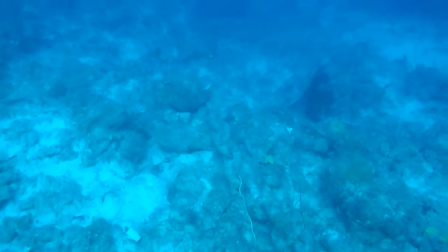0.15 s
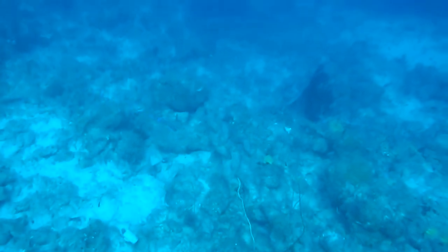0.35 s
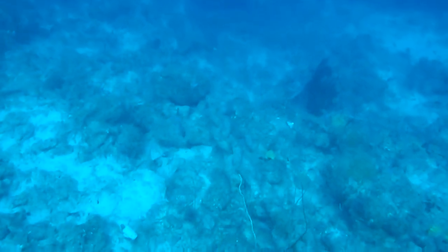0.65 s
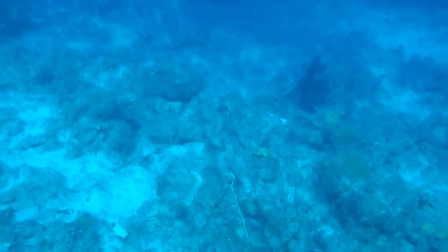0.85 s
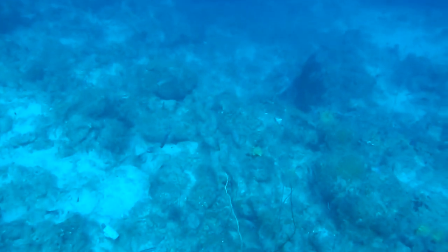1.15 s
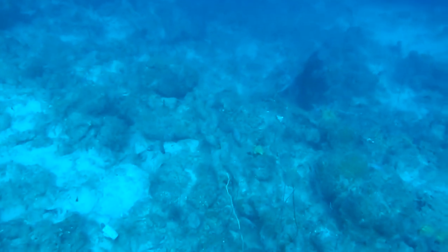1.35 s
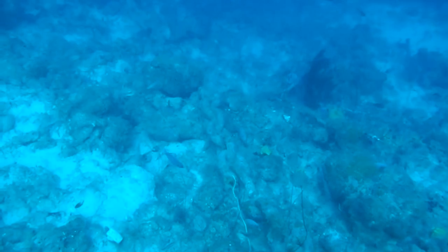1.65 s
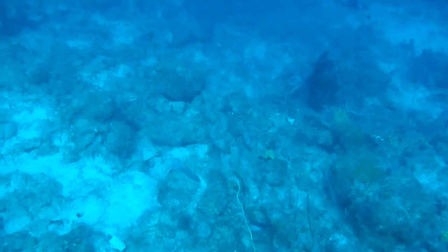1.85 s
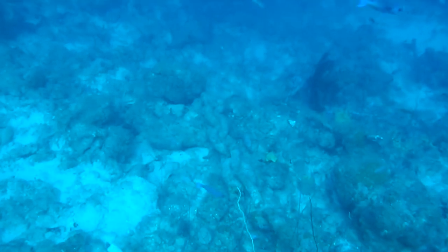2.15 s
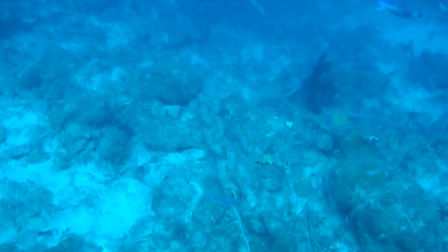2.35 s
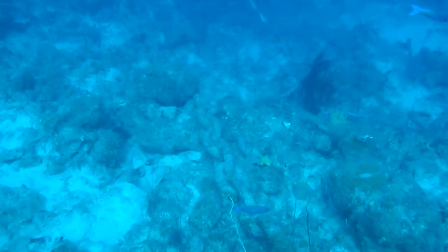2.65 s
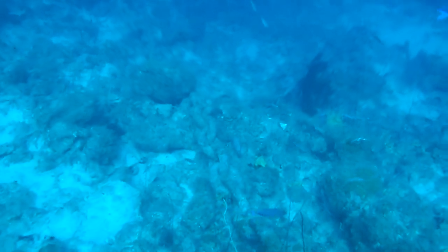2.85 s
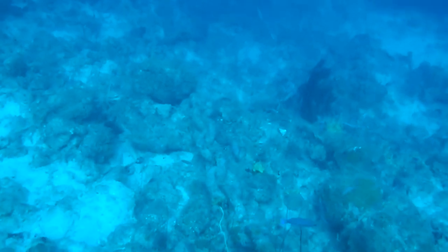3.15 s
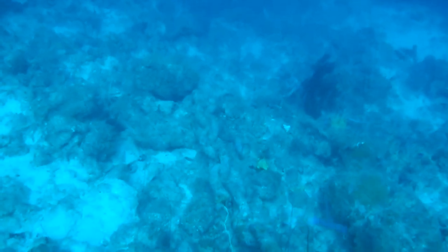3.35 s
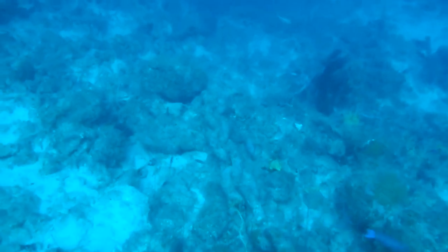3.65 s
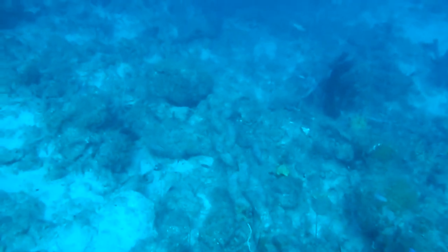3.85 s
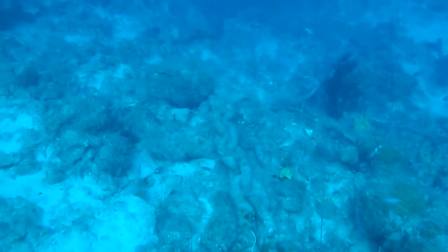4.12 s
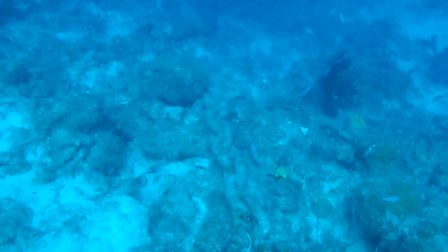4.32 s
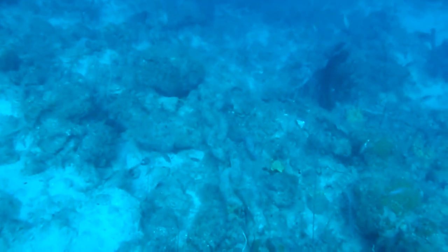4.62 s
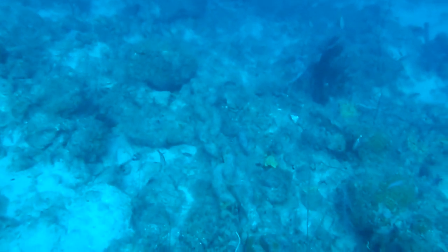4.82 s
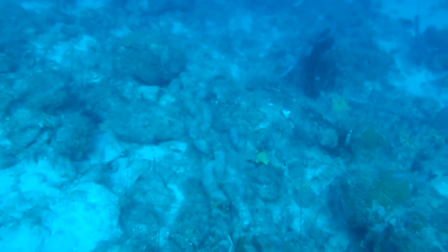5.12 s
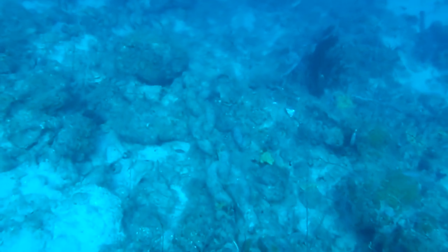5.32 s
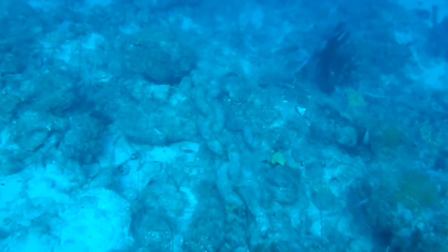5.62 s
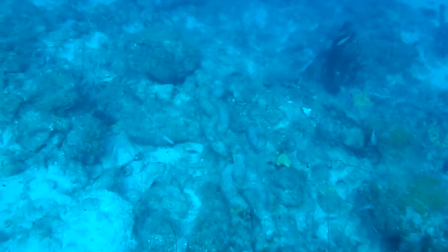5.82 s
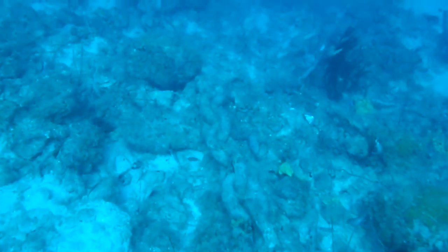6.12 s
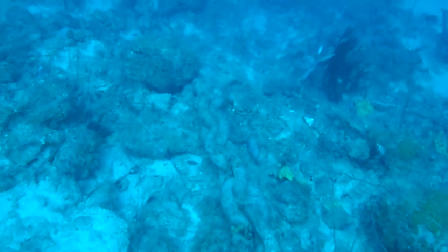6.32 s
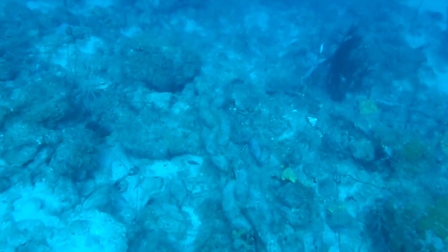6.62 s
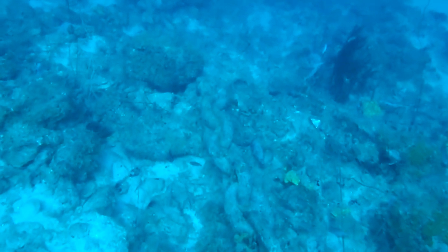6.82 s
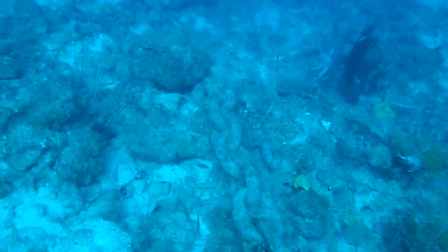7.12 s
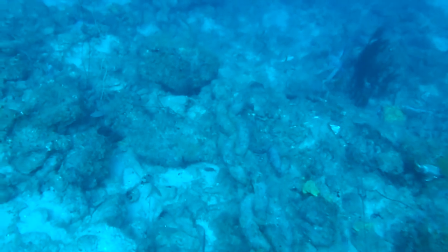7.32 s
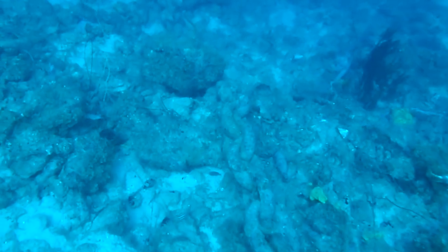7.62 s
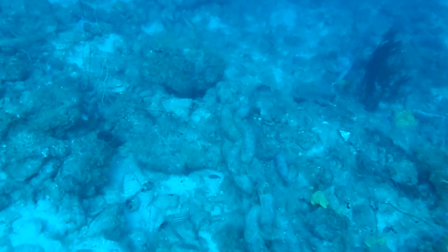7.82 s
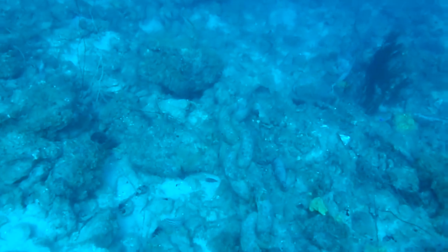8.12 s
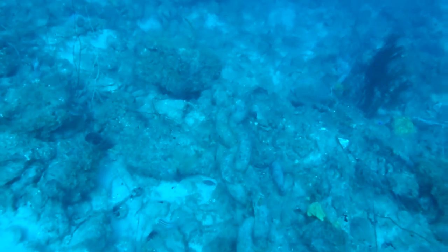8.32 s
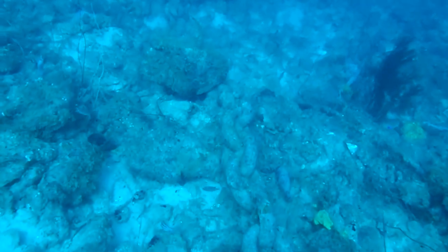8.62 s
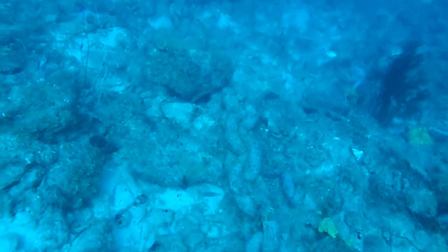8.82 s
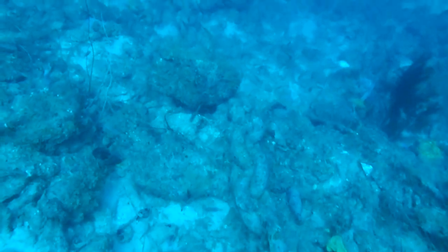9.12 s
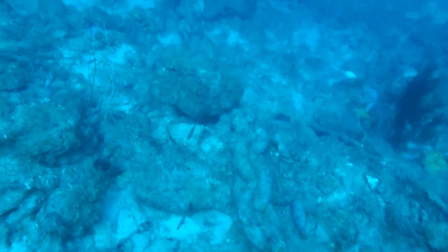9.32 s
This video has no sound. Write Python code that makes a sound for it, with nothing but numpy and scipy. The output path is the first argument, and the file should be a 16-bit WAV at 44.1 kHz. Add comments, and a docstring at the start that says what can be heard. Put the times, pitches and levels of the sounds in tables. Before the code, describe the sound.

A boat engine drones at constant speed, heard underwater through a camera's diving housing. Its rapid knocking rings the hull, while loose parts rattle, a pump whines and churned water rushes behind it. The housing takes a few soft bumps early on, and some harder knocks make the hull boom briefly. The reef adds occasional small pops and two faint ticks.

```python
"""A boat's engine drones at a steady 1800 rpm, heard through the water by a camera in a diving housing.
From the start its knocks repeat fifteen times a second and ring the hull; loose parts rattle, a pump
whines and churned water rushes behind them. From 1.1 s the housing is bumped softly, and from 1.4 s the
reef gives a few small pops. Between 2.3 and 6 s some harder knocks make the hull boom.
Two faint ticks come from the reef at 4.9 and 7.5 s."""
import sys
import numpy as np
from scipy.fft import rfft, irfft, next_fast_len
from scipy.io import wavfile
from scipy.ndimage import map_coordinates

SR = 44100
rng = np.random.default_rng(int(sys.argv[2]) if len(sys.argv) > 2 else 0)


def master(y):
    """Save y as 16-bit WAV."""
    cut = np.clip(np.atleast_2d(y).T, -1, 1)
    pcm = np.round(cut * 32767)  # scale
    wavfile.write(sys.argv[1], SR, pcm.astype(np.int16))


N = 417627
CYCLE_HZ = 15.0  # one engine cycle is two turns of the crankshaft


def amp(db):
    """Amplitude ratio of a level in decibels."""
    return 10 ** (np.asarray(db) / 20)


def unit(x):
    """Normalisation to rms 1."""
    return x / np.sqrt(np.mean(x ** 2) + 1e-20)


def spectrum_db(points, hz):
    """Interpolation of (f/Hz, level/dB) points in log frequency, silent beyond the ends."""
    f, db = np.transpose(points)
    return np.interp(np.log(hz + 1), np.log(f + 1), db, left=-120, right=-120)


def envelope_db(points):
    """Linear interpolation of (t/s, level/dB) points at every sample."""
    s, db = np.transpose(points)
    return np.interp(np.arange(N) / SR, s, db)


def wobble(rate):
    """Slow random modulation: a spline through Gaussian knots, rate of them a second."""
    coarse = np.linspace(0, N, 2000)
    knots = rng.standard_normal(400)
    return np.interp(np.arange(N), coarse, map_coordinates(knots, [coarse * rate / SR], mode="mirror"))


def filtered(x, response):
    """Linear filtering: the spectrum of x times a frequency response."""
    m = next_fast_len(len(x) + SR // 4)
    return irfft(rfft(x, m) * response(np.fft.rfftfreq(m, 1 / SR)), m)[:len(x)]


def resonance(hz, centre, width):
    """Complex response of a damped oscillator."""
    return 1j * hz * width / (centre ** 2 - hz ** 2 + 1j * hz * width)


def noise(spectrum, lifts=(), ripple_db=0):
    """Coloured noise of rms 1, lifted at resonances and comb-filtered by multipath interference."""
    delays_s, phases = rng.uniform(.002, .022, 24), rng.uniform(0, 2 * np.pi, 24)
    grid = np.arange(0, SR / 2, 2)
    comb = unit(np.cos(2 * np.pi * np.outer(grid, delays_s) + phases).sum(1))
    peaks_db = sum(lift * abs(resonance(grid, centre, width)) ** 2 for centre, width, lift in lifts)
    db = spectrum_db(spectrum, grid) + ripple_db * comb + peaks_db
    return unit(filtered(rng.standard_normal(N), lambda hz: np.interp(hz, grid, amp(db))))


def tone(turns, fade_db, fade_rate, drift_rad):
    """Multipath fading: a tone of rms 1 wavers as its paths off surface and seabed shift."""
    fading = amp(fade_db * wobble(fade_rate))
    return unit(fading * np.sin(2 * np.pi * turns + drift_rad * wobble(fade_rate)))


def echo_beat(hz, minimum_s, gain):
    """Two-path interference: a tone dips once for each wavelength that its echo's path gains."""
    path_m_per_s, sound_m_per_s = .308, 1500
    wavelengths = hz * path_m_per_s * (np.arange(N) / SR - minimum_s) / sound_m_per_s
    return unit(abs(1 - gain * np.exp(2j * np.pi * wavelengths)))


# Engine line spectrum: harmonic of the cycle rate, relative level/dB
ENGINE_ORDERS = [(1, -39), (2, -29), (3, -16), (4, -10), (5, -11), (6, -15), (7, -6), (8, -6), (9, -3),
                 (10, -10), (11, -2), (12, 0), (13, -15), (14, -13), (15, -15), (16, -9.5), (17, -11.5),
                 (18, -14), (19, -17), (20, -14), (21, -16), (22, -16), (23, -17), (24, -14), (25, -15),
                 (26, -13), (27, -16), (28, -18), (29, -20), (30, -9), (31, -15), (32, -14), (33, -10),
                 (34, -6.5), (35, -12), (36, -9), (37, 0), (38, -9), (39, -6), (40, -4), (41, -1.5),
                 (42, -6.5), (43, -6), (44, -10), (45, -18), (46, -21), (47, -15.5), (48, -27), (49, -19),
                 (50, -24)]
# Knocks that set the orders' phases: position/cycles, hull mode f/Hz, bandwidth/Hz, weight/dB
CYCLE_KNOCKS = [(.05, 590, 90, -3), (.148, 247, 92, -1), (.17, 56, 16, -3), (.306, 468, 27, 17),
                (.412, 104, 49, -5), (.413, 531, 131, 0), (.511, 607, 80, 0), (.582, 145, 19, 5),
                (.629, 462, 90, -8), (.646, 96, 32, -13), (.815, 310, 80, -2), (.83, 600, 80, -1),
                (.88, 526, 18, 7), (.972, 197, 35, 1)]
# Orders with a strong echo: harmonic, interference minimum t/s, echo gain
ENGINE_ECHOES = [(16, 1, 0.33), (17, 0, 0.42), (47, 2, 0.47), (49, 2.5, 0.46)]
# Envelope of the ringing hull: t/s, level/dB
RING_LEVEL = [(0.1, -26), (1.5, -26.2), (3.0, -27.1), (4.7, -28.6), (7.0, -29.2), (9.3, -29.2)]
def engine(cycle):
    """Periodic forcing gives a harmonic series: low orders are exhaust throb, high ones ring the hull."""
    throb, ring = np.zeros(N), np.zeros(N)
    echoes = {round(k): echo for k, *echo in ENGINE_ECHOES}
    for k, db in ENGINE_ORDERS:
        blows = sum(amp(weight) * resonance(k * CYCLE_HZ, hz, width) * np.exp(-2j * np.pi * k * place)
                    for place, hz, width, weight in CYCLE_KNOCKS)
        turns = k * cycle + np.angle(blows) / (2 * np.pi)
        if k <= 13:
            throb += amp(db) * tone(turns, fade_db=.6, fade_rate=1.2, drift_rad=.05)
        else:  # short waves fade more as the camera moves
            beat = echo_beat(k * CYCLE_HZ, *echoes[k]) if k in echoes else 1
            ring += amp(db) * beat * tone(turns, fade_db=1, fade_rate=.9, drift_rad=.28)
    ring_db = envelope_db(RING_LEVEL)
    throb_db = -28.5 + .17 * (ring_db - ring_db.mean())  # long waves follow the swings only in part
    return amp(throb_db) * unit(throb) + amp(ring_db) * unit(ring)


# Spectrum of the hull's rough noise: f/Hz, relative level/dB
ROUGH_SPECTRUM = [(380, -46), (450, -15.5), (490, -5), (535, -2.5), (565, -0.5), (603, 2), (655, -6),
                  (705, -13.5), (745, -19.5), (820, -41)]
# Envelope of that noise: t/s, level/dB
ROUGH_LEVEL = [(0.1, -35.5), (2.0, -35.5), (2.5, -34), (3.6, -34), (4.1, -35.5), (4.7, -38.3), (9.3, -38.5)]
# Envelope of the hull's strongest mode: t/s, level/dB
BOOM_LEVEL = [(0.1, -38), (1.6, -36.5), (2.0, -38), (2.5, -34), (2.76, -28.5), (2.9, -37), (3.3, -34.5),
              (3.68, -32), (3.87, -37), (4.1, -36.5), (4.7, -43), (9.3, -42)]
BOOM_HZ = 598.5
def hull_noise(swell):
    """Random excitation: no two knocks are alike, so the hull gives rough noise and one mode booms."""
    rough = unit(swell * noise(ROUGH_SPECTRUM))
    mode = filtered(rng.standard_normal(N), lambda hz: resonance(hz, BOOM_HZ, width=54) ** 2)
    return amp(envelope_db(ROUGH_LEVEL)) * rough + amp(envelope_db(BOOM_LEVEL)) * unit(swell * mode)


# Spectrum of the loose parts: f/Hz, relative level/dB
RATTLE_SPECTRUM = [(600, -32.5), (800, -8), (950, -1.5), (1100, 1), (1300, -3), (1500, -4.5), (1580, -7.5),
                   (1900, -32.5)]
# Their resonances: f/Hz, bandwidth/Hz, lift/dB
RATTLE_MODES = [(888, 16, 7), (1075, 35, 6.5), (1272, 29, 6), (1437, 24, 9)]
def loose_parts(cycle):
    """Impact noise swells at each firing: random strikes rattle, those alike in every cycle buzz."""
    firing = amp(np.cos(2 * np.pi * 6 * cycle))  # six firings a cycle
    rattle = noise(RATTLE_SPECTRUM, RATTLE_MODES)
    period = round(SR / CYCLE_HZ)
    strikes = irfft(np.exp(2j * np.pi * rng.random(period // 2 + 1)), period)
    buzz = filtered(np.resize(strikes, N), lambda hz: amp(spectrum_db(RATTLE_SPECTRUM, hz)))
    return amp(-47.6) * unit(firing * rattle) + amp(-46.5) * unit(firing * buzz)


# Envelope of the ringing panel: t/s, level/dB
PANEL_LEVEL = [(0.1, -52.5), (0.8, -56), (3.2, -51.5), (3.7, -55.5), (4.3, -49.5), (5.5, -56), (6.4, -53),
               (8.3, -52), (9.3, -56.5)]
def panel(swell):
    """Resonance: a panel driven by broadband noise rings in one narrow band."""
    ring = filtered(swell * rng.standard_normal(N), lambda hz: resonance(hz, 1879, width=130) ** 2)
    return amp(envelope_db(PANEL_LEVEL)) * unit(ring)


# Pump line spectrum: harmonic, rms level/dB
PUMP_HARMONICS = [(2, -36.3), (3, -47), (4, -44), (5, -61), (6, -49.3), (7, -58), (8, -57), (9, -66),
                  (10, -64.5), (11, -62), (12, -59.3), (13, -63.5), (14, -68), (15, -65.5), (16, -64.5),
                  (17, -62), (18, -67), (19, -68.5), (20, -67.5), (21, -65), (22, -74), (23, -67),
                  (24, -75), (26, -80), (29, -76), (34, -84)]
# Harmonics with a strong echo: harmonic, interference minimum t/s, echo gain
PUMP_ECHOES = [(2, -1.04, .56), (4, 3, 0.51), (6, 1.6, .22), (8, 1.5, .4), (10, 2, .5), (12, 1.3, .6),
               (16, 2.5, 0.44), (20, 0, .5)]
PUMP_HZ, PUMP_FLUTTER_DB = 177.37, .7
def pump():
    """Steady rotation gives a harmonic whine; some harmonics beat against their echoes."""
    shaft = PUMP_HZ * np.arange(N) / SR + .023 * wobble(1.5)
    echoes = {round(k): echo for k, *echo in PUMP_ECHOES}
    whine = np.zeros(N)
    for k, db in PUMP_HARMONICS:
        turns = k * shaft + rng.random()  # each harmonic arrives with its own delay
        if k in echoes:
            line = tone(turns, fade_db=1.05, fade_rate=3.3, drift_rad=.071)
            line *= echo_beat(k * PUMP_HZ, *echoes[k])
        else:
            line = tone(turns, fade_db=1.7, fade_rate=1.4, drift_rad=.18)
        whine += amp(db + PUMP_FLUTTER_DB * wobble(25)) * line
    return whine


# Tones of belt-driven parts: f/Hz, rms level/dB
BELT_TONES = [(295.5, -47), (496.5, -41), (613, -46), (895, -59), (1076, -58), (1432, -59), (1696, -65),
              (4305, -75)]
def belt_drives():
    """Superposition: each belt-driven part radiates a tone at its own frequency."""
    t = np.arange(N) / SR
    return sum(amp(db) * tone(hz * t, fade_db=1.2, fade_rate=4, drift_rad=.9) for hz, db in BELT_TONES)


# Spectrum of the rumble: f/Hz, relative level/dB
RUMBLE_SPECTRUM = [(20, -32), (40, -16), (90, -6), (150, -4.5), (250, -1), (300, -3), (330, -5),
                   (420, -6.5), (520, 1), (700, -6), (820, -22), (1100, -53)]
# Envelope of the rumble: t/s, level/dB
RUMBLE_LEVEL = [(0.3, -35.5), (1.2, -34.5), (2.3, -32), (2.62, -30.5), (3.2, -31.5), (4.2, -34.3),
                (5.8, -34.5), (7.0, -33), (9.0, -34.5)]
# Spectrum of the wash: f/Hz, relative level/dB
WASH_SPECTRUM = [(1200, -25.5), (1600, -12.5), (2100, -2), (2400, -8.5), (2800, -5.5), (3300, -8),
                 (3700, -4), (4100, -8), (4400, -13), (5200, -11), (5450, -18), (6200, -16.5), (6700, -31),
                 (7200, -48)]
# Envelope of the wash: t/s, level/dB
WASH_LEVEL = [(0.3, -49.8), (1.5, -49.1), (6.5, -49.2), (9.0, -50.6)]
# Housing resonances that colour the wash: f/Hz, bandwidth/Hz, lift/dB
HOUSING_MODES = [(2020, 25, 2.5), (2210, 85, 4), (2810, 19, 5), (2700, 24, 1.5), (3603, 420, 7),
                 (4710, 210, 4), (5160, 100, 5), (5920, 200, 6.5)]
# Spectrum of the fizz: f/Hz, relative level/dB
FIZZ_SPECTRUM = [(5000, -18), (7000, -1), (8000, 0.5), (8500, -0.5), (10800, -0.5), (12000, -4.5),
                 (14000, -12.5)]
def water(cycle):
    """Broadband noise: low rumble, churned wash modulated at the crankshaft rate, and faint fizz."""
    rumble = amp(envelope_db(RUMBLE_LEVEL) + .32 * wobble(3.9)) * noise(RUMBLE_SPECTRUM)
    churn_db = .12 * wobble(3.7) + .5 * np.cos(2 * np.pi * 2 * cycle)
    wash = amp(envelope_db(WASH_LEVEL) + churn_db) * noise(WASH_SPECTRUM, HOUSING_MODES, ripple_db=1.9)
    fizz = amp(-80) * noise(FIZZ_SPECTRUM, lifts=[(7830, 160, 4.8)], ripple_db=4.5)
    return rumble + wash + fizz


EVENT_T = np.arange(SR // 4) / SR  # time since an onset, t/s
def damped_mode(hz, t60, attack_s):
    """Free vibration: a sinusoid builds up, then decays by 60 dB every t60 seconds."""
    attack = 1 - np.exp(-EVENT_T / attack_s)
    return attack * amp(-60 * EVENT_T / t60) * np.sin(2 * np.pi * hz * EVENT_T)


def add_at(track, s, sound):
    """Superposition of a transient on the track, starting at s seconds."""
    span = track[round(s * SR):][:len(sound)]
    span += sound[:len(span)]


# Bumps on the housing: t/s, level/dB, f/Hz, T60/s
BUMPS = [(1.078, -7, 258, 0.02), (1.0825, -5, 262, 0.018), (1.841, -11, 145, 0.022),
         (1.917, -19, 125, 0.02), (2.615, -19, 145, 0.022)]
# Modes of a bump: frequency ratio, relative level/dB, T60 ratio
BUMP_MODES = [(1, 0, 1), (1.66, -11, 3)]
def housing_bumps():
    """Impact excitation: a soft bump rings two heavily damped low modes of the housing."""
    out = np.zeros(N)
    for s, db, hz, t60 in BUMPS:
        modes = sum(amp(level) * damped_mode(ratio * hz, longer * t60, attack_s=.0017)
                    for ratio, level, longer in BUMP_MODES)
        add_at(out, s, -amp(db) * modes)
    return out


# Pops from the reef: t/s, level/dB
POPS = [(1.381, -31), (2.956, -24.5), (6.589, -23)]
# Modes of a pop: f/Hz, relative level/dB, T60/s
POP_MODES = [(1200, 0, .022), (1640, -2.5, .016), (1950, -10, .008)]
def reef_pops():
    """Modal decay: three short-lived modes give each small pop its pitch."""
    out = np.zeros(N)
    pop = sum(amp(level) * damped_mode(hz, t60, attack_s=.0006) for hz, level, t60 in POP_MODES)
    for s, db in POPS:
        add_at(out, s, amp(db) * pop)
    return out


# Harder engine knocks: t/s, level/dB
HARD_KNOCKS = [(2.303, -16), (3.095, -21), (3.295, -31), (3.365, -19), (3.557, -24), (3.619, -17.5),
               (6.018, -21)]
def hard_knocks():
    """Impulse response: a harder knock leaves the hull's strongest mode booming briefly."""
    out = np.zeros(N)
    boom = damped_mode(BOOM_HZ, t60=.092, attack_s=.002)
    for s, db in HARD_KNOCKS:
        add_at(out, s, amp(db) * boom)
    return out


# Ticks from the reef: t/s, peak level/dB, centre f/Hz
TICKS = [(4.94, -65, 9900), (7.533, -54, 5800)]
def reef_ticks(t60=.014):
    """Band-limited transients: each tick is a very short, decaying burst of noise."""
    out = np.zeros(N)
    for s, db, centre in TICKS:
        burst = amp(-60 * EVENT_T / t60) * rng.standard_normal(len(EVENT_T))
        crack = filtered(burst, lambda hz: resonance(hz, centre, width=1.1 * centre) ** 4)
        add_at(out, s, amp(db) * crack / abs(crack).max())
    return out


def scene():
    """Superposition of boat, water, housing and reef in one channel."""
    cycle = CYCLE_HZ * np.arange(N) / SR + .0011 * wobble(1.5)  # the governor hunts very slightly
    swell = amp(1.5 * np.cos(2 * np.pi * (cycle - .9)))  # hull and panel noise swell once a cycle
    boat = engine(cycle) + hull_noise(swell) + loose_parts(cycle) + panel(swell) + pump() + belt_drives()
    return (boat + water(cycle) + housing_bumps() + reef_pops() + hard_knocks() + reef_ticks())[None]


def record(dry, fade_in_s=.004, cutoff_hz=14200):
    """Band limiting: the sound opens with a 4 ms fade, and nothing is heard above the cutoff."""
    opening = np.minimum(np.arange(N) / SR / fade_in_s, 1)
    return np.array([filtered(opening * channel, lambda hz: hz < cutoff_hz) for channel in dry])


dry = scene()
out = record(dry)
master(out)
```